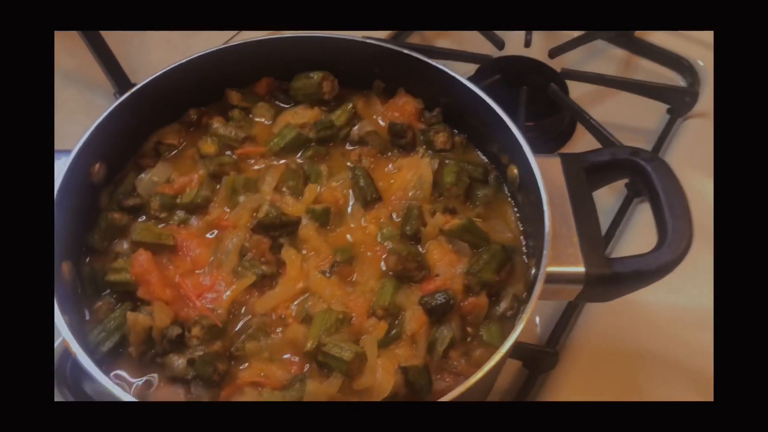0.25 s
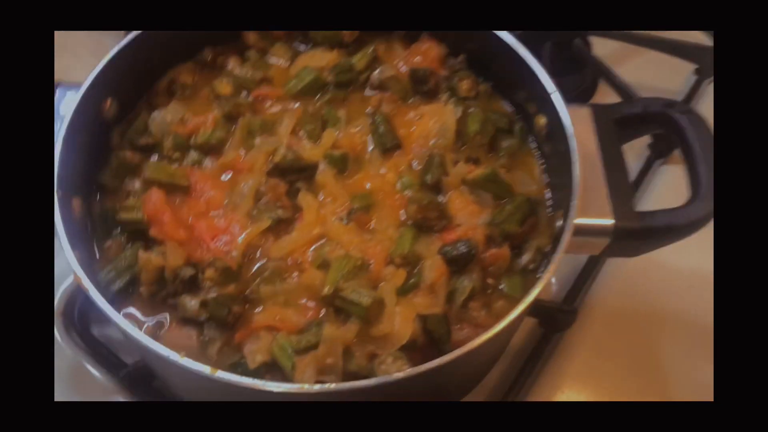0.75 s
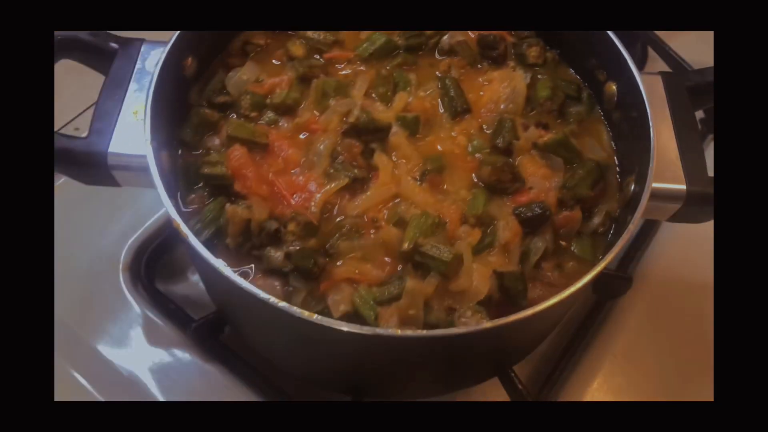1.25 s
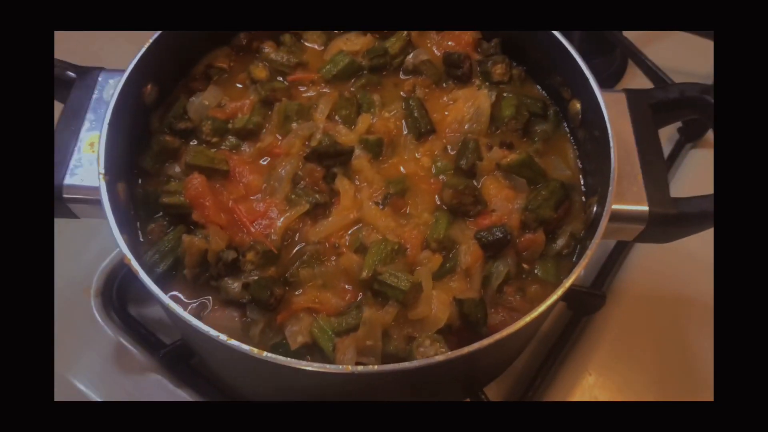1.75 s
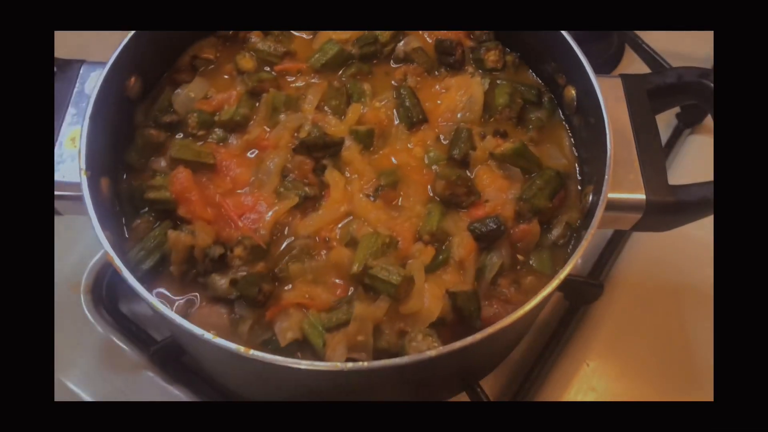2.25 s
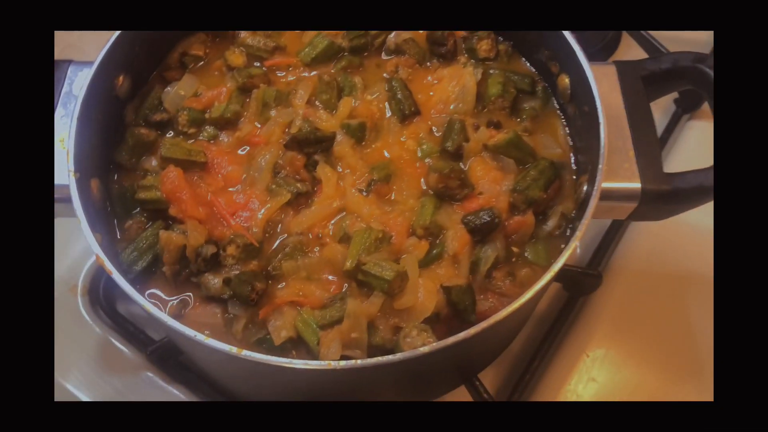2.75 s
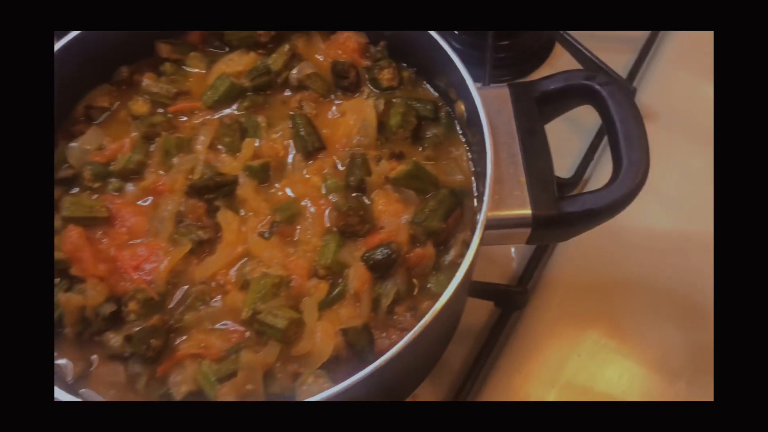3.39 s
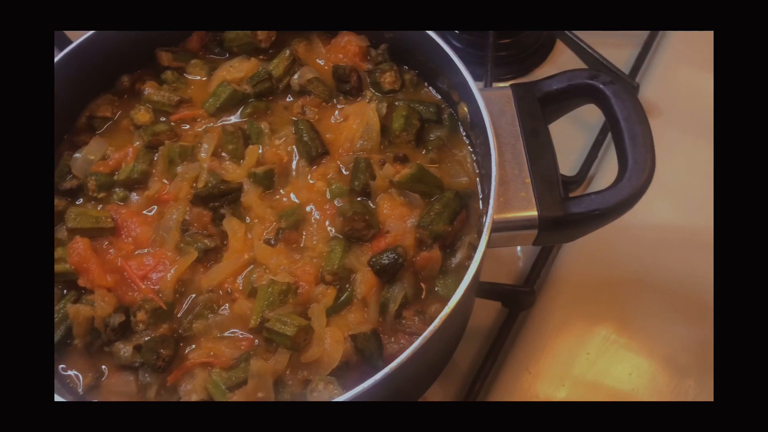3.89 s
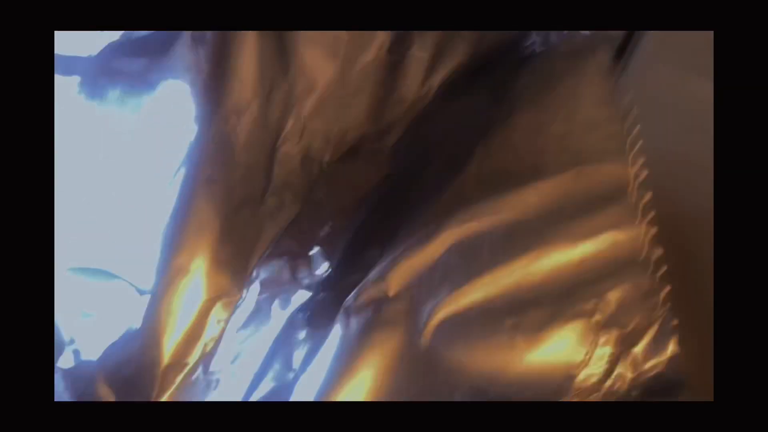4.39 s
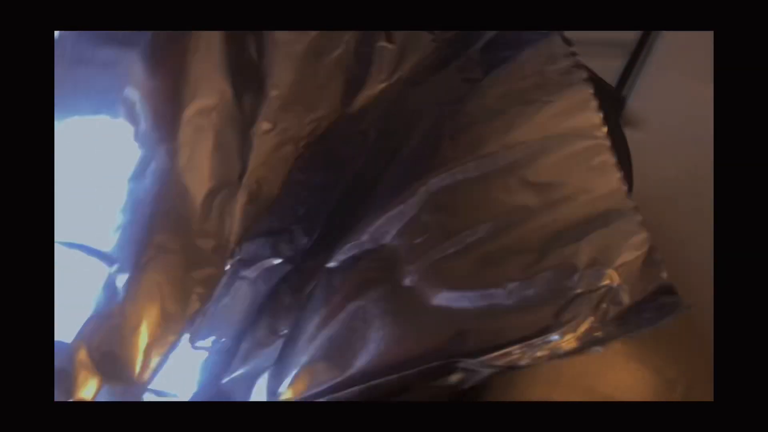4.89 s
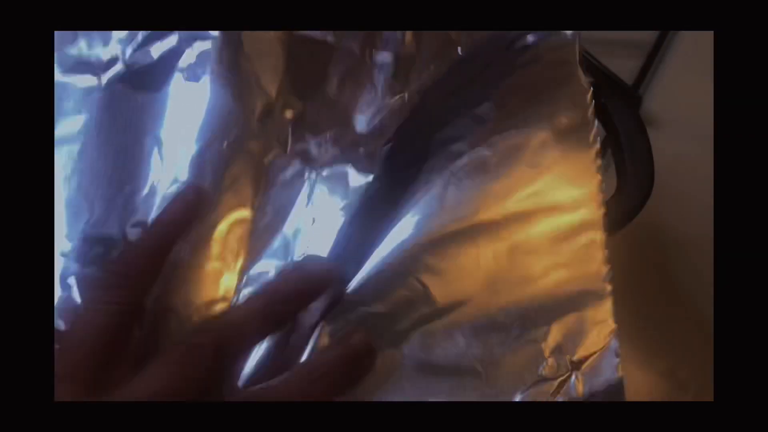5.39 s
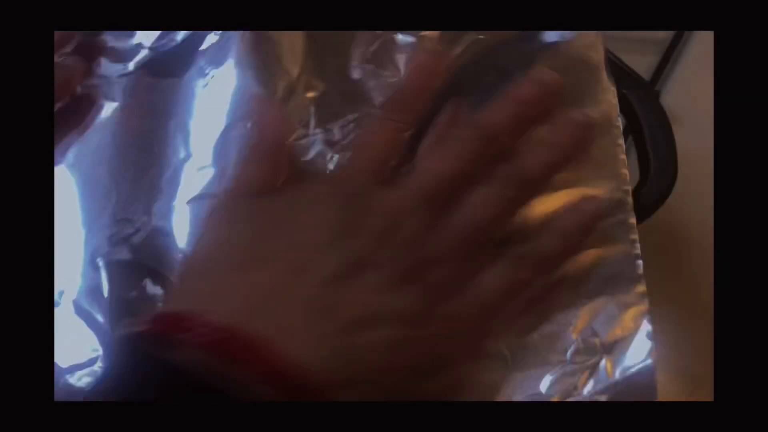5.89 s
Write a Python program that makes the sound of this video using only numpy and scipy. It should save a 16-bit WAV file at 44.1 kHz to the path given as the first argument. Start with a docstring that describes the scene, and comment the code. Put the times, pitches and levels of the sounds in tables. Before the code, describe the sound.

A hand picks up kitchen foil with light crackles, lets it almost rest, then pulls and crumples it in one loud, continuous swarm of crisp clicks. A lull brings muffled knocks on a pan and a low bump. Then the foil crinkles in uneven bursts with hard, bright snaps as it is pressed over the pan. Close, thin-bass microphone, small hard-walled room, low hum and soft hiss throughout.

```python
"""Aluminium foil laid over a pan

A sheet of foil is handled, laid over a pan and pressed down by hand in a small kitchen.
Crinkling is swarms of random clicks, tiny creases buckling, that set the sheet ringing as short noise.
Large creases snap one at a time: a quick rise, then a longer shiver of the whole sheet.
Before the foil is laid on, dull knocks ring the pan's modes (its own tones) and add a thud.
The room answers with echoes, over a steady faint hum and hiss of coloured noise."""
import sys
import numpy as np
from scipy import signal
from scipy.fft import rfft, irfft
from scipy.io import wavfile
from scipy.ndimage import uniform_filter1d

SR = 44100
rng = np.random.default_rng(int(sys.argv[2]) if len(sys.argv) > 2 else 0)


def generate_wav(sig):
    """Save sig (samples, or channels by samples) to the path in sys.argv[1] as 16-bit PCM at SR."""
    pcm = np.round(np.clip(np.atleast_2d(sig).T, -1, 1) * 32767).astype(np.int16)
    wavfile.write(sys.argv[1], SR, pcm)


N = 270774  # length of the sound [samples]

# The hand bends the foil: picks it up, pulls and crumples it, carries it, lays it on and presses it down.
# (start [s], length [s], crinkle [dB], swell over the move [dB],
#  flexing of the whole sheet [dB re crinkle], finest creases [dB re crinkle])
HAND_MOVES = [ (0, 0.065, -43.5, 1, -6, -1), (0.074, 0.054, -36.5, -4.5, -8, -0.5),
              (0.177, 0.074, -44.5, 0, -7, -2.5), (0.275, 0.068, -43.5, 2, -9, -1.5),
              (0.358, 0.071, -51, 7, -3, -5), (0.431, 0.14, -42.5, 0.5, -8, -3),
              (0.603, 0.027, -43.5, -1.5, -19, -4.5), (0.64, 0.18, -38.5, -12.5, -7, -2.5),
              (1.049, 0.052, -49, -7, -0.5, -19), (1.114, .12, -61, 12.5, 0.5, -19),
              (1.243, 0.012, -46, -0.5, -16, 1.5), (1.711, 0.12, -54, -2.5, -12, -23),
              (2.088, 0.15, -49, -4, -7, -4.5), (2.243, 0.037, -40.5, -1, -3.5, 1.5),
              (2.314, .23, -36.5, 2, -6, 1), (2.701, 0.06, -22.5, -1, -4, 2),
              (2.767, 0.22, -25.5, -2, -4, 0.5), (2.876, 0.039, -25, 1, -3.5, -1),
              (3.008, 0.11, -23, -2, -4.5, 0.5), (3.129, 0.067, -28, 0, -4, 1),
              (3.206, 0.031, -25.5, -1.5, -4, 2.5), (3.252, 0.058, -33, -10.5, -27, 2.5),
              (3.553, 0.01, -51, -4, 4, -14), (3.618, .016, -30, -19, 7, -1.5),
              (3.955, 0.02, -48, -6.5, 15, 2), (4.204, .11, -51.5, -2, -7, 1.5),
              (4.335, 0.12, -41.5, 8, -9.5, 1), (4.473, 0.034, -27, -2, -8, 4),
              (4.504, .26, -37.5, -10, -16, -3), (4.808, 0.21, -36, 1, -10.5, -3.5),
              (5.114, 0.1, -48.5, 12, -10, -5), (5.199, 0.037, -26.5, -1, -10.5, 2.5),
              (5.247, 0.11, -38.5, -8, -4, -1), (5.451, 0.067, -26.5, -0.5, -10, 3.5),
              (5.516, 0.066, -36.5, 4.5, -7, 2), (5.941, 0.042, -30.5, 3, -5.5, 4),
              (6.013, 0.01, -24, -3, -10.5, 4.5), (6.125, .032, -41, 15, -20, 0)]
# Large creases snapping through, before a shared gain: (time [s], level [dB], extra treble [dB])
CREASE_SNAPS = [(0.0778, -16, 26), (0.177, -26, 7), (.2845, -34, 10), (.441, -19, 3), (0.735, -19.5, 32),
                (0.8031, -22, 10), (1.2454, -24, 14), (1.344, -35.5, -23), (1.493, -27.5, 3),
                (1.616, -26, 7), (1.963, -30, 1), (2.023, -27.5, -4), (2.132, -28, -17), (2.4491, -13, 20),
                (2.493, -10.5, 16), (2.6081, -15.5, -5), (2.705, -10, -2), (3.386, -39, 16),
                (3.48, -36, 4.5), (3.534, -36.5, 2), (3.6203, -24.5, -25), (3.7742, -35, 7),
                (3.833, -34, -4), (3.889, -29.5, -41), (3.905, -33, 23), (4.0587, -35, 1),
                (4.166, -25.5, 1), (4.19, -20, 14), (4.3411, -23, 6), (4.4781, -12, 4), (4.5949, -13, 14),
                (4.6312, -12.5, 12), (4.788, -25, -19), (5.009, -4.5, 22.5), (5.045, -16.5, -10),
                (5.1636, -12.5, 18.5), (5.2715, -15, -20), (5.457, -11, 23), (5.9601, -4.5, 22),
                (6.014, -8, 29), (6.0982, -14, 20)]
# Dull knocks on pan and stove: (time [s], level [dB], centre of the blow's energy [Hz], thud t60 [s])
# t60 is the time a sound takes to fade by 60 dB.
DULL_KNOCKS = [(.443, -37, 910, 0.14), (.478, -41.5, 330, 0.071), (0.586, -42, 377, 0.17),
               (2.348, -36, 354, 0.23), (2.531, -33, 440, 0.18), (3.595, -29.5, 736, 0.063),
               (3.624, -44, 169, 0.28), (3.77, -41.5, 1050, 0.16), (3.835, -38, 444, 0.067),
               (3.958, -37.5, 1330, 0.22), (3.974, -38, 219, 0.22), (4.061, -39, 1270, 0.18),
               (4.18, -20, 660, 0.13), (4.183, -21.5, 524, 0.039), (4.191, -18, 142, 0.082),
               (4.255, -35, 1540, .06)]
# What the pan on its grate rings with: (frequency [Hz], level [dB], t60 [s])
PAN_MODES = [(85, 3, 0.39), (150.4, -1, 0.24), (191, -1.5, 0.6), (313, 14, 0.1), (490, 0, 0.1),
             (630, -7.5, 0.14), (714, 3, 0.089), (878, 0, .07), (1082, 11, 0.037), (1430, 3, 0.045)]
# Colour of a snap: (frequency [Hz], level [dB])
SNAP_COLOUR = [(60, -8), (400, -6), (1000, -1.5), (1900, -2), (2500, 1.5), (6000, -1), (10000, -7),
               (16000, -13)]
# Colour of the foil held in the air, and lying on the pan: (frequency [Hz], level [dB])
HELD_COLOUR = [(35, -36), (75, 0), (170, -6.5), (240, -5), (360, 0.5), (520, -6.5), (1050, -3.5),
               (1450, 0.5), (1950, -3.5), (2450, 1), (3100, 1), (6500, 0.5), (11000, -2), (16000, -6)]
ON_PAN_COLOUR = [(35, -39), (75, 10.5), (130, -0.5), (300, -4.5), (470, -4), (670, 2), (1020, 2),
                 (1300, 1.5), (2100, 2), (3200, 3), (6500, 2), (11000, -2.5), (16000, -7.5)]
# How long the kitchen echoes: (frequency [Hz], t60 [s])
KITCHEN_DECAY = [(100, 0.39), (500, 0.63), (2000, 0.5), (5000, 0.46), (9000, 0.21), (15000, 0.29)]
# Colours of the kitchen's steady hum and hiss: (frequency [Hz], level [dB])
HUM_COLOUR = [(30, -7), (80, 0), (115, -6.5), (160, -1.5), (200, -13), (260, 2.5), (310, -3.5), (410, -9.5),
              (500, -10.5), (620, -4), (800, -3.5), (1000, -12.5), (1300, -13.5), (2600, -62.5)]
HISS_COLOUR = [(500, -28), (1300, -6.5), (2200, -10), (4000, -19.5), (8000, -27), (16000, -24)]

LAID_ON_S = 4.3  # the foil comes to lie on the pan
HELD_DB = -64.5  # trembling of the sheet while it is held in the air
TOUCH_S, TOUCH_DB = 0.034, -27  # fingers graze the foil this long before a move, this far below it
# A move takes hold in a fixed time plus a share of its length; the creases settle when the hand stops.
ATTACK_S, ATTACK_SHARE, SETTLE_DB_PER_S = 0.005, 0.09, 520
# A stronger snap dies sooner: ring and level of a typical snap, and the rise that halves the ring.
SNAP_T60_S, SNAP_TYPICAL_DB, SNAP_HALVING_DB = 0.11, -21, 29
HUM_DB, HISS_DB = -56, -63.5
CUTOFF_HZ = 16100  # top of the recorded range


def crinkling(flex_hz=1000, fine_hz=8500, gains_db=(2.5, 10, 4.5), patches=6, size=2048):
    """Harder bending buckles more creases a second; patches of the sheet ring anew as its shape changes."""
    levels = bending()
    clicks = buckles(per_s=2000 * from_db(0.35 * (levels[0] + 38)), spread_db=2.0, even_s=0.026)
    # crinkle in the middle, flexing below it, the finest creases above
    zones = [signal.butter(2, [flex_hz, fine_hz], "band", fs=SR, output="sos"),
             signal.butter(4, flex_hz, "low", fs=SR, output="sos"),
             signal.butter(4, fine_hz, "high", fs=SR, output="sos")]
    drive = clicks * from_db(levels + np.array(gains_db)[:, None])
    patch = rng.integers(0, patches, N)  # each click lands on a random patch
    out = np.zeros((len(zones), N + size))
    for start in range(0, N, size):
        now = slice(start, start + size)
        colour = HELD_COLOUR if start / SR < LAID_ON_S else ON_PAN_COLOUR
        for k in range(patches):
            ring = sheet_ring(colour, t60=0.03, facet_db=2.0, size=size)
            hits = drive[:, now] * (patch[now] == k)
            rung = signal.fftconvolve(hits, ring[None], axes=1)
            out[:, start:start + rung.shape[1]] += rung
    return sum(signal.sosfilt(zone, part[:N]) for zone, part in zip(zones, out))


def bending(held_flex_db=-8, held_fine_db=-14):
    """Crinkle, flex and fine levels in time [dB]: a light touch, a rise, a swell or sag, then settling."""
    t = np.arange(N) / SR
    held_levels = HELD_DB + np.array([[0], [held_flex_db], [held_fine_db]])
    power = (t < LAID_ON_S) * from_db(held_levels) ** 2
    for start, length, db, swell_db, flex_db, fine_db in HAND_MOVES:
        during = slice(*np.searchsorted(t, [start - TOUCH_S, start + length + 0.5]))
        age = t[during] - start
        grip = np.clip(age / (ATTACK_S + ATTACK_SHARE * length), from_db(TOUCH_DB), 1)
        swell = swell_db * np.clip(age / length, 0, 1)
        settling = SETTLE_DB_PER_S * np.maximum(age - length, 0)
        effort_db = db + swell - settling
        power[:, during] += (grip * from_db(effort_db + np.array([[0], [flex_db], [fine_db]]))) ** 2
    return 10 * np.log10(power + 1e-12)


def buckles(per_s, spread_db, even_s):
    """Random clicks, many small and few large; the hand feeds in energy at an even pace."""
    sizes = from_db(spread_db * np.minimum(rng.exponential(1, N), 4)) * rng.choice([-1, 1], N)
    clicks = sizes * (rng.random(N) < per_s / SR)
    # dividing by the recent power evens out crowded and sparse stretches
    power = uniform_filter1d(clicks ** 2, max(int(even_s * SR), 2))
    return clicks / np.sqrt(np.maximum(power, 0) + 0.00044)


def sheet_ring(colour, t60, facet_db, bright_db=0, size=8192, count=30):
    """A buckle rings countless modes, heard as fading noise; chance facets favour some pitches. Energy 1."""
    hz, t = bins(size), np.arange(size) / SR
    facet_places = np.linspace(0, np.sqrt(SR / 2), count)
    facets = np.interp(np.sqrt(hz), facet_places, rng.normal(0, facet_db, count))
    shelf = bright_db * hz ** 2 / (hz ** 2 + 7000 ** 2)  # extra treble
    modes = coloured(rng.standard_normal(size), at_hz(colour, hz) + facets + shelf)
    return unit_energy(modes * from_db(-60 * t / max(t60, 0.002)))


def snaps(gain_db=11, give_way_s=0.00048, size=8192):
    """A large crease gives way within a millisecond or two, then the whole sheet shivers."""
    out = np.zeros(N)
    rise = 1 - np.exp(-np.arange(size) / SR / give_way_s)
    for s, db, bright_db in CREASE_SNAPS:
        t60 = SNAP_T60_S * 0.5 ** ((db - SNAP_TYPICAL_DB) / SNAP_HALVING_DB)
        shiver = sheet_ring(SNAP_COLOUR, t60, 1.8, bright_db, size=size)
        add(out, s, from_db(db + gain_db) * unit_energy(rise * shiver))
    return out


def knocks(width_octaves=0.6, ring=0.19, thud=14.3, softness=2.0, size=12288):
    """Each blow wakes the pan's modes near its own pitch, with a short toneless thud."""
    out, t = np.zeros(N), np.arange(size) / SR
    hz, mode_db, t60 = np.array(PAN_MODES).T[:, :, None]
    for s, db, centre_hz, thud_t60 in DULL_KNOCKS:
        reach = np.exp(-0.5 * (np.log2(hz / centre_hz) / width_octaves) ** 2)
        fading = from_db(mode_db - 60 * t / t60)
        modes = reach * fading * np.sin(2 * np.pi * hz * t) * rng.choice([-1, 1], hz.shape)
        colour = [(centre_hz / 6, -10), (centre_hz, 0), (centre_hz * 2, -6), (centre_hz * 8, -30)]
        blow = ring * modes.sum(axis=0) + thud * sheet_ring(colour, thud_t60, 1, size=size)
        # a soft contact carries little treble
        contact = signal.butter(4, softness * centre_hz, fs=SR, output="sos")
        add(out, s, from_db(db) * signal.sosfilt(contact, blow))
    return out


def kitchen(x, wet_db, roam_per_s=11, count=4):
    """The sound comes from shifting spots, and each spot has its own pattern of echoes."""
    turn, echoes = np.arange(N) / SR * roam_per_s, 0
    for spot in range(count):
        share = np.maximum(np.cos(2 * np.pi * (turn - spot / count)), 0)
        echoes = echoes + signal.oaconvolve(x * share, room_tail())[:N]
    return x + from_db(wet_db) * echoes


def room_tail(dull_db=-5, first_echo_s=0.0032, size=24576, count=12):
    """Dense echoes from tiles and cupboards, fading faster in the high treble. Energy 1."""
    hz, t = bins(size), np.arange(size) / SR
    centres = np.geomspace(100, 16000, count)
    white, tail = rfft(rng.standard_normal(size)), 0
    for centre, pick in zip(centres, np.eye(count)):
        # one slice of the noise around this centre, fading at its own rate
        band = irfft(white * np.interp(np.log(hz), np.log(centres), pick), size)
        tail = tail + band * from_db(dull_db * centre / CUTOFF_HZ - 60 * t / at_hz(KITCHEN_DECAY, centre))
    return unit_energy(tail * (t > first_echo_s))


def steady(spectrum, db):
    """Hum or hiss: smooth random noise of a given colour and average level."""
    noise = coloured(rng.standard_normal(N), at_hz(spectrum, bins(N)))
    return from_db(db) * np.sqrt(N) * unit_energy(noise)


def from_db(db):
    """Turn decibels into a gain."""
    return 10 ** (np.asarray(db) / 20)


def unit_energy(x):
    """Scale so that the squares sum to one."""
    return x / np.sqrt(np.sum(x ** 2) + 1e-20)


def bins(size):
    """Frequencies [Hz] in the spectrum of that many samples, never below 1."""
    return np.maximum(np.arange(size // 2 + 1) * SR / size, 1)


def at_hz(points, hz):
    """Read a table between its points, with frequency spaced as the ear hears it (logarithmic)."""
    points = np.array(points)
    return np.interp(np.log(hz), np.log(points[:, 0]), points[:, 1])


def coloured(x, db):
    """Give each frequency of x its gain."""
    return irfft(rfft(x) * from_db(db), len(x))


def add(out, s, sound):
    """Mix a sound in at a time [s]."""
    start = max(round(s * SR), 0)
    out[start:start + len(sound)] += sound[:max(N - start, 0)]


def scene(foil_db=-0.5):
    """Foil and knocks echo in the kitchen, over its hum and hiss."""
    foil = from_db(foil_db) * (crinkling() + snaps())
    room = kitchen(foil, wet_db=-8) + kitchen(knocks(), wet_db=-13.0)
    return (room + steady(HUM_COLOUR, HUM_DB) + steady(HISS_COLOUR, HISS_DB))[None]


def record(dry, rumble_hz=52):
    """The small microphone loses the deep bass; the top is cut steeply."""
    thin = signal.sosfilt(signal.butter(4, rumble_hz, "high", fs=SR, output="sos"), dry)
    return signal.sosfilt(signal.ellip(10, 0.2, 70, CUTOFF_HZ, fs=SR, output="sos"), thin)


dry = scene()
out = record(dry)
generate_wav(out)
```